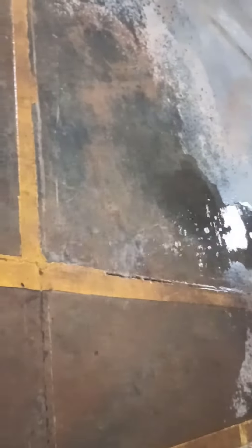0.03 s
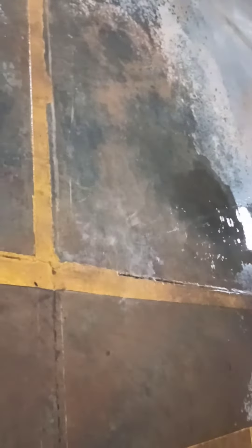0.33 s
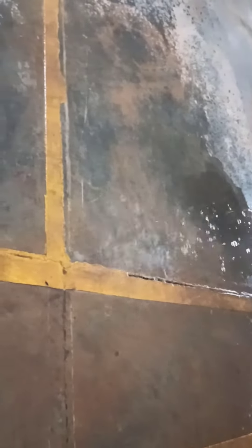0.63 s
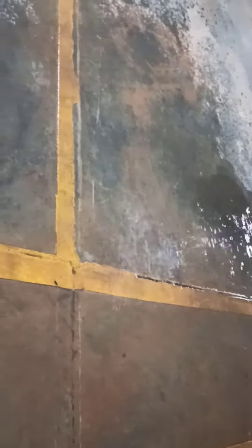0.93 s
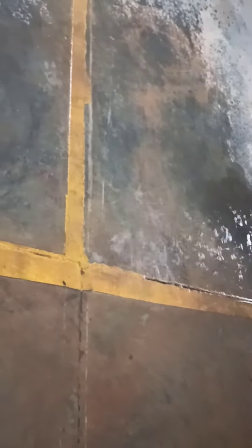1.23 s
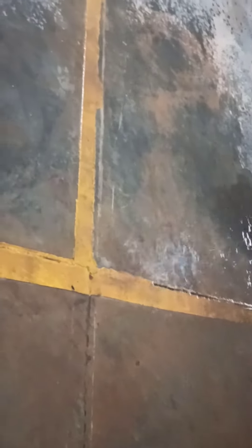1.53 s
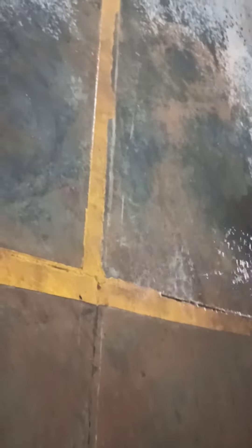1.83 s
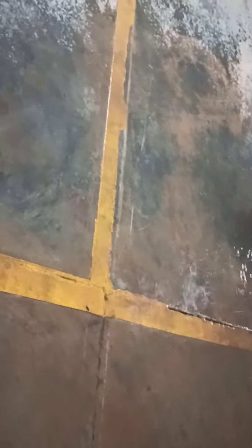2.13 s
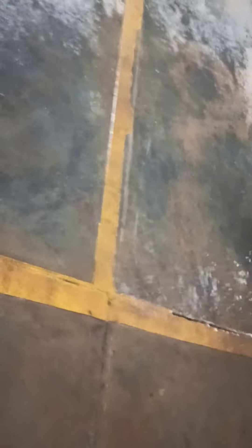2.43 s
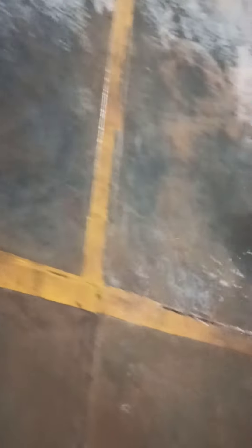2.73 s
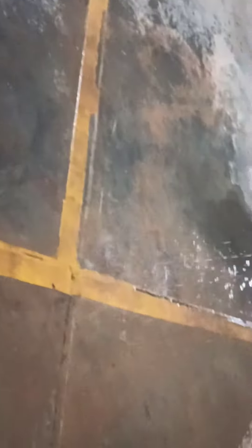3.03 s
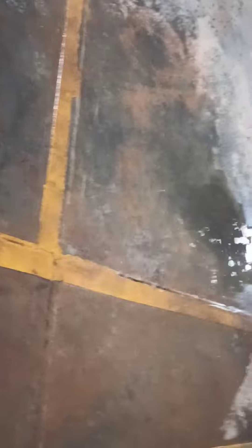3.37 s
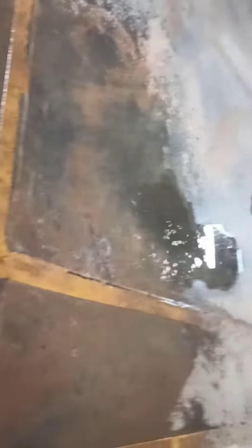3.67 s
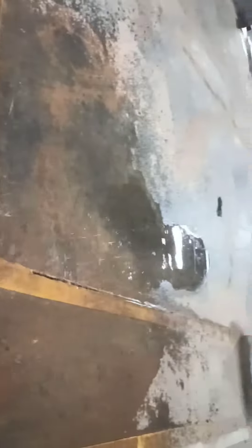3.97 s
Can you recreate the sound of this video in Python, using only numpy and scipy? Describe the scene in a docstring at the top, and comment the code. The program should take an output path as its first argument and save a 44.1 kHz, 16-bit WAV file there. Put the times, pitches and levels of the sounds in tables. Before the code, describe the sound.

Rainwater drips from a roof edge and splats irregularly on a hard wet floor close to the microphone. Small drops patter throughout, while rain hisses further off and a distant machine hums over a low rumble.

```python
"""Under a roof, a stereo microphone faces a hard wet floor. From the start, rain hisses further off,
a distant machine hums over a low rumble, and small drops patter. Then big drops of runoff from the
roof edge splat close by: each a millisecond crack, followed by flying droplets and the slap of the
roof and walls. Sharp drips fall between them, and near the end the bass of the rumble swells."""
import sys
import numpy as np
from scipy import signal
from scipy.fft import rfft, irfft
from scipy.io import wavfile

SR = 44100
rng = np.random.default_rng(int(sys.argv[2]) if len(sys.argv) > 2 else 0)


def unload_audio(sound):
    """Save the sound as a 16-bit wav file, at the path given as the first command line argument."""
    columns = np.transpose(np.atleast_2d(sound))
    # keep every value between -1 and 1, then stretch to whole-number steps
    steps = np.round(np.clip(columns, -1, 1) * 32767)
    wavfile.write(sys.argv[1], SR, steps.astype(np.int16))


N = 176400


def from_db(db):
    """Decibels to gain."""
    return 10 ** (np.asarray(db) / 20)


def rms_one(x):
    """Scale to rms 1."""
    return x / np.sqrt(np.mean(x ** 2) + 1e-20)


def at_hz(points, hz):
    """Read a table on a log-frequency axis."""
    f, value = np.transpose(points)
    return np.interp(np.log(hz + 1e-9), np.log(f), value)


def drift(rate_hz):
    """Slow random wander with a spread of 1."""
    pole = np.exp(-80 * np.pi * rate_hz / SR)
    slow = signal.lfilter([1], [1, -2 * pole, pole * pole], rng.standard_normal(N // 40 + 2002))[2000:]
    return np.interp(np.arange(N) / 40, np.arange(len(slow)), rms_one(slow))


# Open air at the microphone. Each row: frequency in Hz, correlation of left and right.
AIR_CORRELATION = [(60, 0.99), (300, 0.89), (550, 0.48), (800, 0.43), (1300, -0.11), (2500, -0.057)]

def air_noise(spectrum, flicker_db):
    """Outdoor noise at rms 1, centred in the bass and wide in the treble; each octave flickers alone."""
    hz = np.arange(N // 2 + 1) * SR / N
    mid, side = rfft(rng.standard_normal((2, N))) * from_db(at_hz(spectrum, hz))
    alike = at_hz(AIR_CORRELATION, hz)
    stereo = np.sqrt(1 + alike) * mid + np.sqrt(1 - alike) * side * [[1], [-1]]
    octave = np.log2(hz + 1)
    bands = (irfft(stereo * np.maximum(1 - abs(octave - k), 0), N) for k in range(4, 15))
    return rms_one(sum(band * from_db(flicker_db * drift(12)) for band in bands))


# Rain beyond the roof. Each row: frequency in Hz, relative spectral level in dB.
RAIN_SPECTRUM = [(1000, -7.5), (1600, -2.5), (2500, -2), (4200, 2.5), (5300, -4.5), (7300, 7.5), (8600, 0),
                 (12000, -9), (15500, -7.5)]

def rain():
    """Further off, the rain blurs into a flickering hiss."""
    return from_db(-39) * air_noise(RAIN_SPECTRUM, flicker_db=4)


# The rumble outside. Each row: frequency in Hz, relative spectral level in dB.
RUMBLE_SPECTRUM = [(15, -40), (42, -40), (65, -6), (125, 1.5), (190, -1), (270, -6.5), (400, -6),
                   (580, -10), (760, -8), (1000, -15), (2000, -24)]
# The swell of its bass. Each row: time in seconds, gain in dB.
BASS_SWELL = [(0, 0.5), (2.75, 0), (3.5, 1.5), (3.75, 6.5), (4, 1)]

def rumble(bass_edge_hz=270):
    """Low outdoor noise whose bass swells near the end."""
    noise = from_db(-44.5) * air_noise(RUMBLE_SPECTRUM, flicker_db=1.2)
    bass = signal.sosfiltfilt(signal.butter(2, bass_edge_hz, fs=SR, output="sos"), noise)
    swell = from_db(np.interp(np.arange(N) / SR, *np.transpose(BASS_SWELL)))
    return noise + bass * (swell - 1)


# A machine in the distance. Each row: pitch in Hz, relative level in dB, pitch wander in Hz.
MACHINE_TONES = [(119.6, -59, 1), (249.8, -57.5, .6), (339.8, -53, 3.5), (387.5, -50, .3), (519.3, -62, .6),
                 (649.6, -62.5, .8), (677.2, -62.5, 2), (775, -61.5, .6)]

def machine_hum():
    """Distant tones, dead centre; the more a tone wanders in pitch, the more its level wavers."""
    t, hum = np.arange(N) / SR, np.zeros(N)
    for hz, db, wander_hz in MACHINE_TONES:
        waver = 1 + .18 * wander_hz * drift(11.4)
        cycles = hz * t + np.cumsum(wander_hz * drift(9.34)) / SR
        hum += from_db(db - .5) * rms_one(waver * np.sin(2 * np.pi * cycles))
    return hum


# The voices of a drop hitting the floor: crack, plop, slap and tick.
# Each row: low edge in Hz, high edge in Hz, gain in dB, further gain toward roof and walls in dB.
IMPACT_VOICES = [(6000, 8100, .5, -4.5), (1500, 2900, 0, .5), (3300, 4800, .5, -1.5),
                 (11600, 15500, 2.5, -3)]

def impacts(drops, size=640, level_window_s=.0021):
    """Each drop (a row as in BIG_DROPS) is a burst with a wet tail. Returns voices x channels x N."""
    count, t = len(drops), np.arange(size) / SR
    noise = rng.standard_normal((count, 3, size))
    decay_s = .0006 * from_db(.3 * drops[:, 2, None, None])  # the more plop, the longer the burst
    wet_tail = from_db(-22) * np.exp(-t / (10 * decay_s))
    burst = (noise[:, :1] + noise[:, 1:]) * (np.exp(-t / decay_s) + wet_tail)
    lag, pan = rng.standard_normal((2, count, 1))
    sides = np.array([.5, -.5])
    arrival_s = drops[:, :1] + sides * (25e-6 + 10e-6 * lag)  # left hears it a little after right
    place = np.maximum(arrival_s * SR, 0).astype(int)[:, :, None] + np.arange(size)
    voices, plop, tick = [], 1, 3
    for k, (low_hz, high_hz, gain_db, _) in enumerate(IMPACT_VOICES):
        band = signal.butter(2 if k == plop else 3, [low_hz, high_hz], "band", fs=SR, output="sos")
        wave = signal.sosfilt(band, burst)
        wave /= np.sqrt((wave ** 2).sum(2, keepdims=True) / (level_window_s * SR))
        db = drops[:, 1] + gain_db + (drops[:, k + 1] if k else 0)
        pan_db = .8 * pan - (3 if k == tick else 0)  # ticks lean right
        wave *= from_db(db[:, None] + pan_db * sides)[:, :, None]
        voices.append([np.bincount(place[:, c].ravel(), wave[:, c].ravel(), N)[:N] for c in range(2)])
    return np.array(voices)


def patter(count=1200, per_second=55):
    """Small drops fall at random, each with its own level and its own mix of plop, slap and tick."""
    start_s = np.cumsum(rng.exponential(1, count)) / per_second
    crack_db = -40 + 8 * np.minimum(rng.standard_normal(count), 1)
    colour_db = np.array([-20.5, -12.5, -11.5]) + 6.5 * np.minimum(rng.standard_normal((count, 3)), 1)
    return np.column_stack([start_s, crack_db, colour_db])[start_s < N / SR]


# Runoff landing close to the microphone. Each row: start in seconds, relative crack level in dB,
# then plop, slap and tick in dB against the crack, before the gains of the voices.
BIG_DROPS = [(0.124, -28, -4.5, 1.5, -5), (0.1717, -20, -21, -8, -3.5), (0.4995, -19, -39, -22, -13),
             (0.534, -18.5, -4.5, -1, -8.5), (0.542, -18.5, -16, -8.5, -16), (0.6168, -27.5, -14, 1, -6),
             (0.64, -19.5, -21, -7, -22), (0.653, -14, -22, -9, -10.5), (0.929, -31, -11, -2, -10),
             (1.0035, -29, -29, -1.5, -14), (1.0868, -17, -18.5, -6.5, -12), (1.189, -21, -19, -7, -12),
             (1.363, -16, -24.5, -13, -17), (1.4595, -24.5, -13.5, -0.5, -25), (1.5791, -23, -4.5, 4, -11),
             (1.8197, -27, -0.5, 0.5, -8), (1.9599, -24.5, -18, -8.5, -20), (2.045, -22, -16, -13.5, -13.5),
             (2.175, -21.5, -9, -14, -11), (2.19, -36, 0, 5.5, -5), (2.2336, -24, -15, -16, -12),
             (2.5543, -13.5, -20, -7.5, -29), (2.5814, -23.5, -7.5, -3, -22), (2.7368, -22, -16.5, -6, -23),
             (2.885, -25.5, -14.5, -3.5, -15), (2.9486, -22.5, -10.5, 0, -7),
             (3.1025, -20.5, -41, -10.5, -14), (3.1095, -19, -28, -9.5, -20), (3.2135, -30.5, -7, -6, -6),
             (3.2545, -14.5, -27, -13.5, -10.5), (3.3484, -19.5, -31, -21, -25),
             (3.3908, -14, -32, -13, -10.5), (3.6293, -19.5, -29, -7.5, -10), (3.6485, -26, -7.5, 0.5, -12)]

def splats(room_share=.75):
    """Big drops as the microphone hears them, and as the room does: part of their variety is aim."""
    drops = np.array(BIG_DROPS, float)
    typical_db = drops[:, 1:].mean(0)
    outward_db = typical_db + room_share * (drops[:, 1:] - typical_db)
    return impacts(drops), impacts(np.column_stack([drops[:, 0], outward_db]))


def spray(per_splat=5, delay_s=.012, flight_s=.045):
    """Every splat throws a few quieter droplets that land just after it."""
    droplets = np.repeat(np.array(BIG_DROPS, float), per_splat, axis=0)
    droplets[:, 0] += delay_s + flight_s * rng.exponential(1, len(droplets))
    droplets[:, 1] += -17.5 + rng.standard_normal(len(droplets))
    return droplets


# First reflections off roof and walls. Each row: delay after the impact in seconds, gain in dB.
REFLECTIONS = [(0.0114, -12), (0.0175, -7.5), (0.0263, -7.5)]

def roof_and_walls(roof_delay_s=.0071, build_s=.0032, early_t60_s=.19, late_t60_s=1):
    """Response of the roofed space: a gap, a few reflections, then a short grainy tail."""
    t = np.arange(SR // 2) / SR
    age = np.maximum(t - roof_delay_s, 0)
    decay = from_db(-60 * age / early_t60_s) + from_db(-16 - 60 * age / late_t60_s)
    grain_db = 3.5 * np.repeat(rng.uniform(-1.6, 1, len(t)), 32)[:len(t)]
    envelope = (1 - np.exp(-age / build_s)) * decay * from_db(grain_db)
    response = rng.standard_normal((2, len(t))) * envelope / np.sqrt(np.sum(envelope ** 2))
    for delay_s, db in REFLECTIONS:
        response[[0, 1], int(delay_s * SR) + rng.integers(-12, 12, 2)] += from_db(db)
    return response


# Drips on bare floor. Each row: start in seconds, relative crack level in dB, tick in dB against it.
SHARP_DRIPS = [(0.4208, -28, -12), (0.4419, -23, -14), (0.5165, -25, -9), (0.6714, -19, -18),
               (0.6996, -25, -15), (0.9104, -37, 5), (0.9729, -37, 7), (1.333, -28, -6), (1.5111, -25, -15),
               (1.6879, -27, -11), (1.9875, -24, -19), (2.3423, -26, -12), (2.4514, -28, -8),
               (2.5519, -20.5, -21), (2.6411, -26, -14), (3.4299, -24, -11), (3.5032, -34, -1),
               (3.5816, -30, -1), (3.7693, -29, -6), (3.8027, -32, -3), (3.8992, -25, -11),
               (3.9496, -25, -11)]

def drips(plop_db=-23, slap_db=-15):
    """Sharp drips throw no spray and have hardly any plop."""
    start_s, crack_db, tick_db = np.transpose(SHARP_DRIPS)
    return np.column_stack([start_s, crack_db, np.tile([plop_db, slap_db], (len(start_s), 1)), tick_db])


def scene():
    """From under the roof: near drops and their reflections, with rain, rumble and hum beyond."""
    background = rain() + rumble() + machine_hum()
    response = roof_and_walls()
    direct, scattered = splats()
    sharp = impacts(drips())
    small = impacts(np.vstack([spray(), patter()]))
    outward = scattered + small + from_db(-2.5) * sharp
    to_room = sum(from_db(room_db) * voice for voice, (*_, room_db) in zip(outward, IMPACT_VOICES))
    reflected = signal.fftconvolve(to_room, response, axes=1)[:, :N]
    return (direct + sharp + small).sum(0) + reflected + background


def record(dry, ceiling=.7, notch_hz=(8400, 11700), treble_edge_hz=15500, cutoff_hz=16600):
    """Peaks are rounded; the treble has a deep dip around 10 kHz and the top is cut."""
    rounded = ceiling * np.tanh(dry / ceiling)
    notched = signal.sosfilt(signal.cheby1(4, .5, notch_hz, "bandstop", fs=SR, output="sos"), rounded)
    dulled = signal.sosfilt(signal.cheby1(8, .5, treble_edge_hz, fs=SR, output="sos"), notched)
    leak = from_db(-24) * rounded  # sets the floor of the dip
    return signal.sosfilt(signal.ellip(8, .3, 75, cutoff_hz, fs=SR, output="sos"), dulled + leak)


dry = scene()
out = record(dry)
unload_audio(out)
```